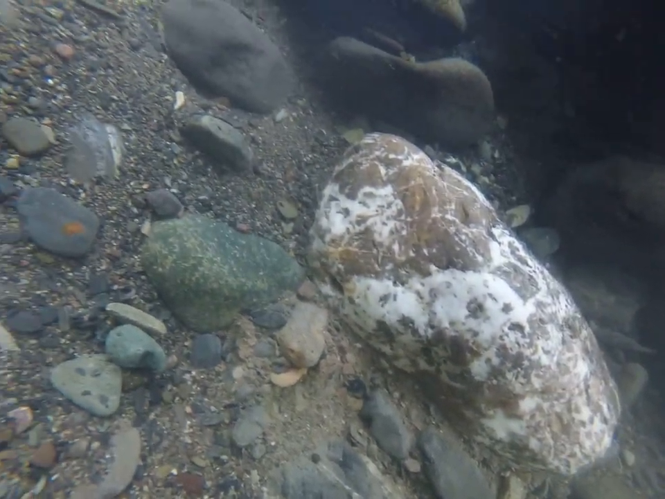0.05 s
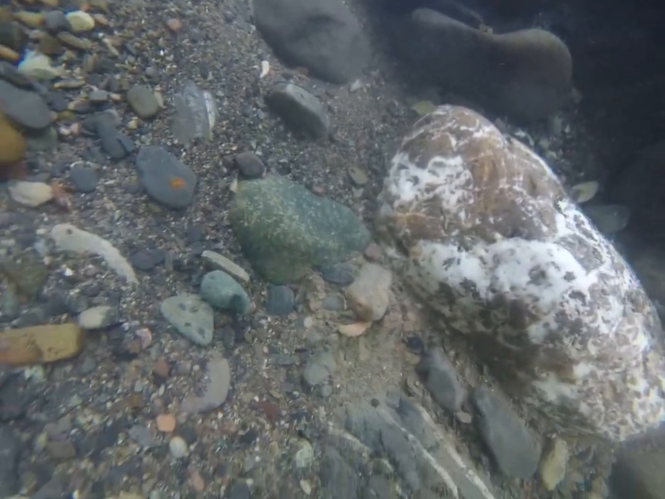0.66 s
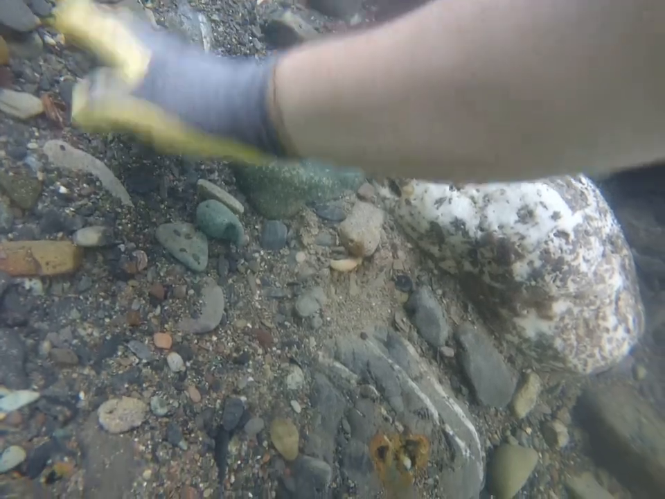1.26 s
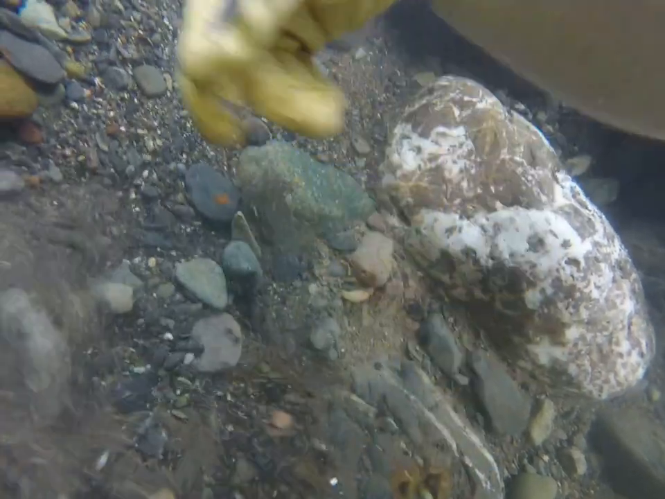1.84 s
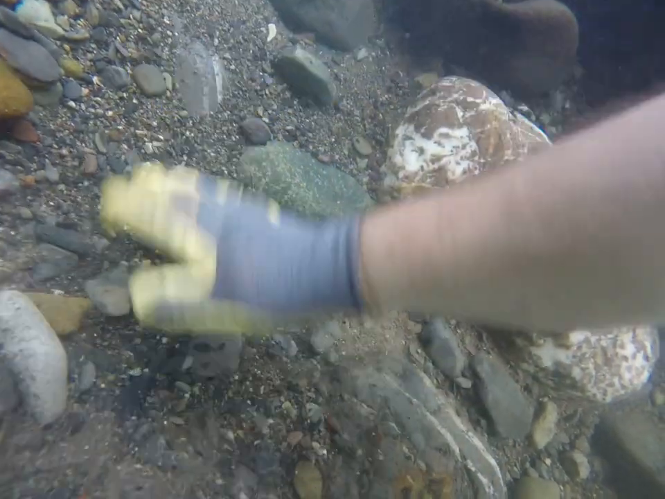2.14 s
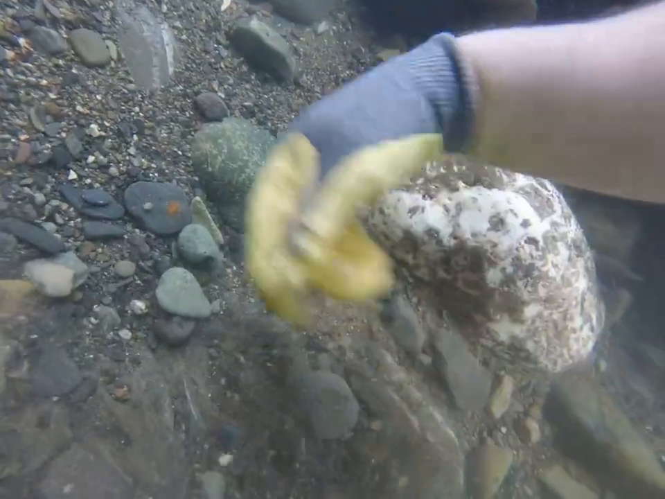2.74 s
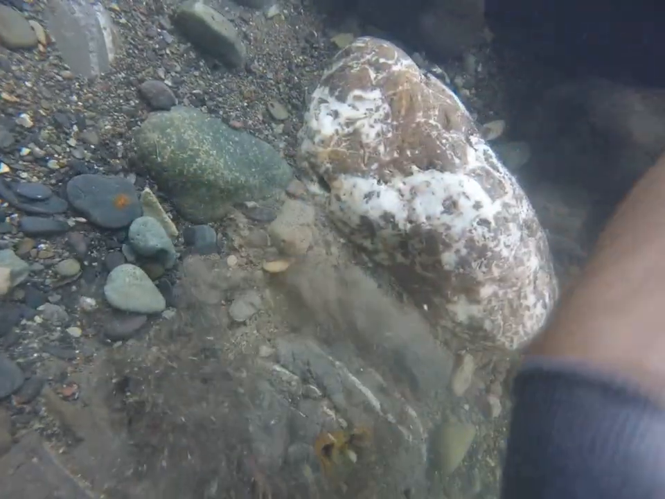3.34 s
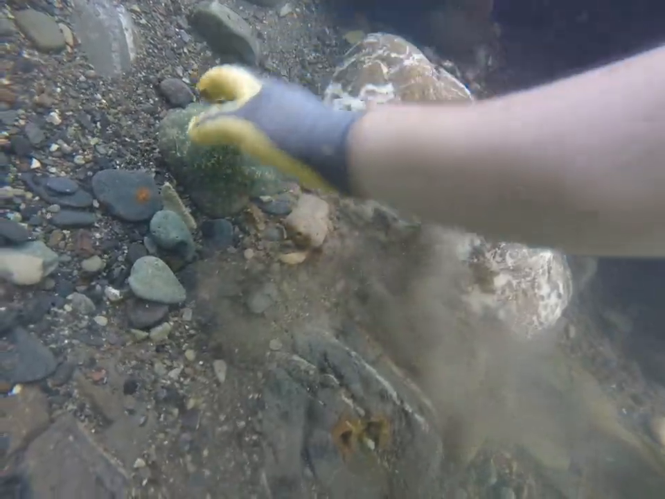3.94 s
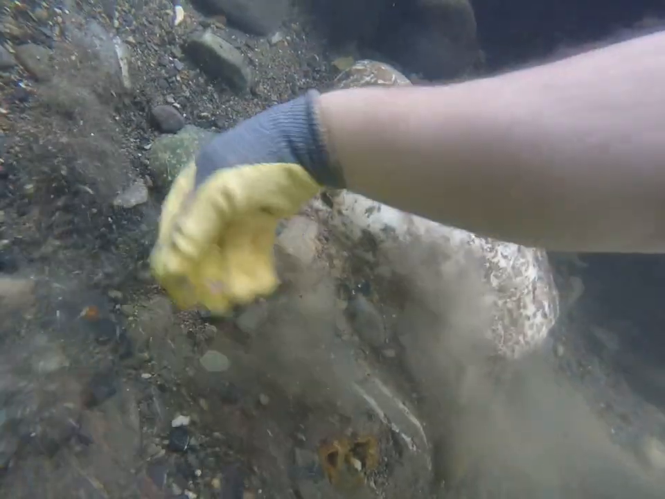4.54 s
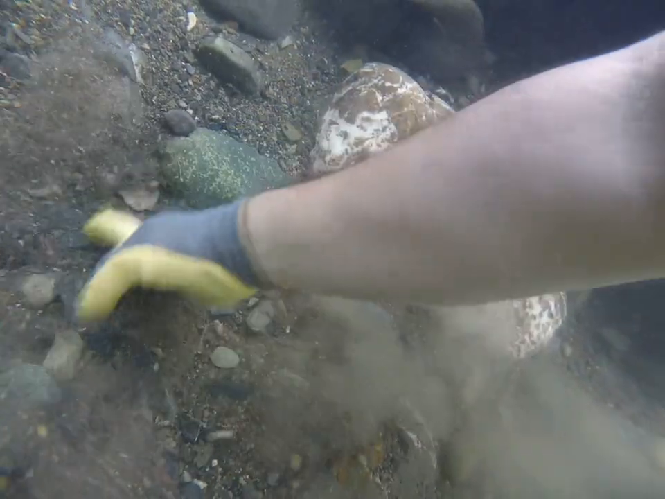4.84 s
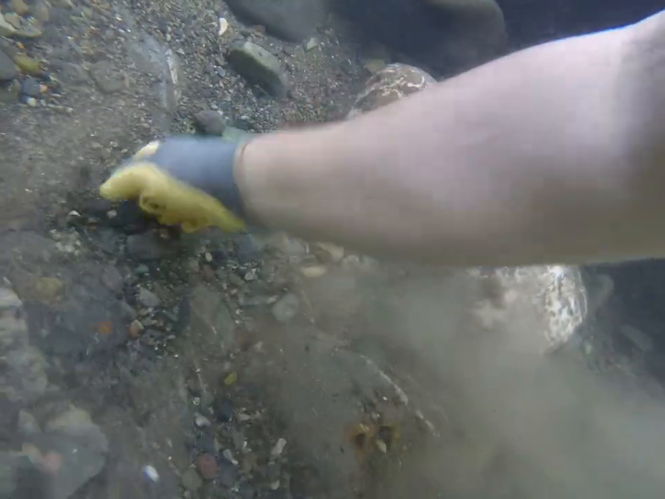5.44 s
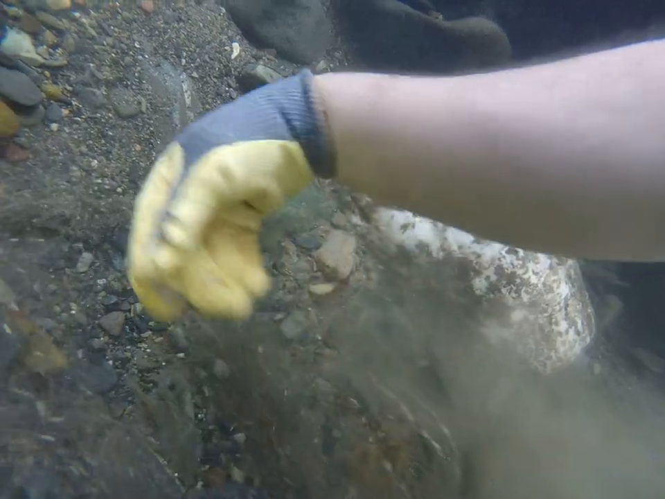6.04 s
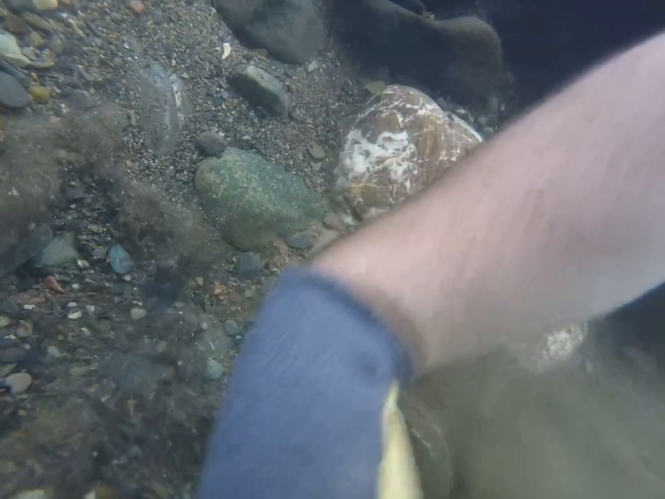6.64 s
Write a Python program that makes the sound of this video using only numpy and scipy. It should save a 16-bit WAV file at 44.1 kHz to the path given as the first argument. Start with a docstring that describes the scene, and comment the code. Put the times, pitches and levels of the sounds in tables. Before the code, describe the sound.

A gloved hand digs through a gravel river bed, heard from a microphone in a waterproof case underwater. A few dull stone knocks and a loud hollow glug come first. Then repeated short strokes scrape grit and sand and make pebbles click, with sharper clusters of clacks in the second half. Water rumbles and gurgles softly throughout, with tiny high bubble pings and a faint hiss.

```python
"""River bed, heard from a waterproof camera case under water: a gloved hand digs through gravel.
Each stroke pushes water ahead of it, scrapes grit and sand and knocks stones together; loose grit
trickles back in between. Water rumbles and glugs, tiny bubbles ping. All of it arrives
through the case, which rings briefly with a hollow note near 610 Hz. A faint hiss lies underneath."""
import sys
import numpy as np
from scipy import signal
from scipy.fft import rfft, irfft
from scipy.io import wavfile

SR = 44100
rng = np.random.default_rng(int(sys.argv[2]) if len(sys.argv) > 2 else 0)


def wrap_up_sound(samples):
    """Save the sound to the file named by the first command line argument, as 16-bit audio."""
    columns = np.atleast_2d(samples).T
    # keep every value between -1 and 1, then stretch to whole-number steps
    tamed = np.clip(columns, -1, 1)
    steps = np.round(tamed * 32767).astype(np.int16)
    wavfile.write(sys.argv[1], SR, steps)


N = 295029

# case modes, wall (thud), stiffer (clack), highest (crack): (frequency [Hz], gain [dB], t60 [s])
THUD_MODES = [(450, -29.5, 0.018), (611.3, -0.5, 0.034), (960, -19, 0.037)]
CLACK_MODES = [(1190, -9.5, 0.005), (1697, -19.5, 0.015), (1812, -18, 0.025), (2363, -9.5, 0.016),
               (2620, -9.5, 0.0097), (2888, -7.5, 0.0053), (3660, -8, 0.007), (4080, -17.5, 0.017)]
CRACK_MODES = [(4540, -3, 0.0033), (5720, 4, 0.0041), (6280, -1.5, 0.0054), (7590, 6, 0.0037),
               (8200, 2.5, 0.0047), (9320, 2, 0.0024), (11100, 11, 0.0016), (13000, 17, 0.00045)]
# bands where the walls cancel: (centre [Hz], width [Hz])
CASE_NOTCHES = [(1130, 165), (1430, 90), (3250, 220), (8550, 450)]
# background water rumble, dipping after the loud knock at 4.3 s: (time [s], level [dB])
RUMBLE = [(0.0, -54), (0.7, -52), (1.15, -61), (1.65, -50), (2.2, -59), (2.9, -53.5), (3.4, -55.5),
          (4.3, -47.5), (4.42, -64), (4.88, -68), (4.96, -53), (6.68, -73)]
# noise spectra of water, hiss and glove: (frequency [Hz], relative density [dB])
SLOSH_SPECTRUM = [(20, 6), (45, -3), (90, -1), (180, -3), (320, -5), (500, -3), (800, -38.5), (1500, -53.5)]
HISS_SPECTRUM = [(100, -26), (900, -7), (2700, -9.5), (5000, -17), (10000, -26.5), (15000, -21.5)]
SCUFF_SPECTRUM = [(60, -25.5), (180, -9.5), (330, -2), (480, -0.5), (620, 11.5), (780, -7), (940, -21.5),
                  (1200, -58.5)]
# hand and heavy stones pushing into the bed: (time [s], peak [dB], pitch [Hz])
THUMPS = [(0.278, -28.5, 165), (0.594, -27, 96), (2.343, -38, 36), (4.965, -36, 89), (5.684, -30.5, 50.3),
          (6.066, -17, 193), (6.46, -27.5, 85)]
# larger stones colliding: (time [s], thud drive [dB], clack drive [dB], crack drive [dB])
STONE_KNOCKS = [(0.2795, -14, -33, -35), (0.3383, -6.5, -8.5, -28), (0.3495, -10.5, -18, -41),
                (0.374, -19, -29.5, -57), (0.4538, -7, -21.5, -53), (0.468, -35, -27, -35.5),
                (0.4762, -26, -14, -28), (0.4922, -16.5, -28, -50), (0.5167, -19, -30.5, -41),
                (0.585, -26, -24.5, -46), (0.6233, -36, -25.5, -45), (0.6655, -29, -38, -47),
                (1.8372, -26.5, -33, -21.5), (1.6092, -24, -23.5, -23.5), (1.8669, -35, -42, -20.5),
                (2.0098, -37, -33.5, -52), (2.161, -51, -33, -38), (2.3167, -26.5, -21, -23.5),
                (2.448, -28, -27, -27), (2.488, -30, -20.5, -32), (2.5145, -14.5, -27.5, -31),
                (2.6565, -10, -27.5, -64), (2.733, -22, -24.5, -34), (2.809, -22, -25, -25.5),
                (2.8526, -36, -25.5, -27), (2.924, -34.5, -29, -29), (3.0511, -34, -27.5, -41),
                (3.2622, -44, -30, -16), (3.281, -30, -19, -17.5), (3.575, -24.5, -24.5, -40),
                (3.7066, -15, -6.5, -16.5), (3.8015, -31, -25, -37), (4.1601, -32, -33, -39),
                (4.2235, -15, -16, -13.5), (4.2672, -7, -2, -17), (4.2995, -9, -1, -14.5),
                (4.3208, -31, -13, -13), (4.3363, -2, 1.5, -29.5), (4.3538, -12, -8.5, -22),
                (4.46, -25.5, -27.5, -32), (4.5193, -20.5, -18, -36.5), (4.6124, -26.5, -25.5, -40),
                (4.682, -14, -8, -25.5), (5.2971, -24.5, -23.5, -22.5), (5.325, -24, -23, -22),
                (5.3822, -24, -12, -15.5), (5.5101, -27.5, -23, -23.5), (5.615, -34, -22.5, -31),
                (5.7109, -12, -8, -16), (5.7234, -21, -22, -14), (5.7484, -6, -6, -11),
                (5.7702, -26, -10.5, -8), (5.7984, -40, -12.5, -8.5), (5.8069, -13, -5.5, -18),
                (5.8478, -10.5, -8.5, -22), (5.9401, -25, -23.5, -35), (6.0652, -6, -4.5, -21),
                (6.1715, -12.5, -15, -16.5), (6.1869, -9.5, -6.5, -22), (6.1967, -12, -13, -12.5),
                (6.2368, -9, -6.5, -17.5), (6.5665, -7.5, -4, -7.5), (6.5715, -22, -8.5, -6.5),
                (6.5951, -31, -5, -16), (6.609, -9, -6.5, -11.5)]
# hand strokes: (start [s], hold [s], gravel [dB], pushed water [dB])
STROKES = [(0.341, 0.011, -54.5, -41), (0.463, 0.014, -61, -39.5), (1.606, 0.03, -50.5, -61),
           (1.79, 0.16, -51, -49.5), (2.329, 0.19, -45.5, -46), (2.505, 0.2, -55.5, -46),
           (2.75, 0.026, -49, -43.5), (3.23, 0.035, -40.5, -38), (4.222, 0.086, -40.5, -36.5),
           (5.002, 0.041, -52, -41.5), (5.302, 0.13, -49.5, -44), (5.54, 0.07, -47, -41),
           (5.71, 0.097, -34, -35.5), (6.201, 0.046, -44, -40), (6.481, 0.098, -35.5, -31.5)]
# loose grains trickling back: (time [s], grit [dB], sand [dB])
TRICKLE = [(1.385, -87, -90), (1.405, -66, -61), (1.7, -57.5, -52.5), (2.25, -60, -62.5),
           (2.8, -47.5, -52.5), (3.15, -61, -67), (3.35, -53.5, -53), (3.8, -58.5, -61.5),
           (4.15, -68.5, -70), (4.45, -78.5, -71.5), (4.91, -73.5, -71), (4.95, -53, -54), (5.9, -50, -55),
           (6.1, -47.5, -56), (6.68, -52.5, -51.5)]
# tiny bubbles: (time [s], level [dB], pitch [Hz])
BUBBLES = [(0.38, -43, 11440), (1.595, -31, 9380), (2.334, -34, 7350), (2.658, -20.5, 7600),
           (3.706, -13.5, 7400), (4.95, -22.5, 9820), (5.325, -23, 9870), (5.381, -23, 9600),
           (5.725, -16, 9700), (5.879, -24, 9750), (6.1, -27.5, 9870)]
# water glugs on the case: (time [s], peak [dB], pitch [Hz], swell [s])
GLUGS = [(0.588, 0, 645, 0.0032), (0.602, -16.5, 683, 0.005), (0.64, -21, 635, 0.0049),
         (0.667, -13.5, 625, 0.0029), (0.679, -12, 615, 0.006), (0.73, -16.5, 605, 0.0035),
         (0.754, -25, 597, 0.00494), (0.803, -20, 618, 0.0043), (0.851, -36, 590, 0.0044),
         (0.918, -30.5, 646, 0.006), (0.972, -26.5, 613, 0.0031), (1.228, -33, 600, 0.0032),
         (1.293, -37, 619, 0.0039), (2.417, -22, 607, 0.005), (2.783, -17.5, 606, 0.0039),
         (3.689, -23.5, 642, 0.0044), (3.988, -18, 648, 0.00333), (4.015, -16.5, 610, 0.0046),
         (4.027, -12.5, 609, 0.0064), (4.078, -21, 620, 0.0044), (4.256, -16, 660, 0.0035),
         (5.023, -24.5, 623, 0.005), (5.841, -18.5, 548, 0.0042), (6.532, -12.5, 575, 0.0055)]


def from_db(db):
    return 10 ** (np.asarray(db) / 20)


def unit_rms(x):
    return x / np.sqrt(np.mean(x ** 2) + 1e-20)


def clicks(times_s, heights):
    """Single-sample impulses."""
    out = np.zeros(N)
    np.add.at(out, np.clip(np.round(times_s * SR).astype(int), 0, N - 1), heights)
    return out


def add(out, time_s, sound):
    start = int(time_s * SR)
    out[start:start + len(sound)] += sound[:N - start]


def butter(x, hz, kind, order=2):
    return signal.sosfilt(signal.butter(order, hz, kind, fs=SR, output="sos"), x)


def noise(spectrum):
    """Coloured noise, rms 1."""
    hz, db = np.transpose(spectrum)
    bins_hz = np.maximum(np.fft.rfftfreq(N, 1 / SR), 1)
    gain = from_db(np.interp(np.log(bins_hz), np.log(hz), db))
    return unit_rms(irfft(rfft(rng.standard_normal(N)) * gain, N))


def gain_curve(rows, column=1):
    """A dB column as gain per sample."""
    columns = np.transpose(rows)
    return from_db(np.interp(np.arange(N) / SR, columns[0], columns[column]))


def swell(start_s, hold_s, rise_db_per_s, fall_db_per_s):
    """Attack, hold, release as gain per sample."""
    t = np.arange(N) / SR
    db = np.minimum((t - start_s) * rise_db_per_s, (start_s + hold_s - t) * fall_db_per_s)
    return from_db(np.clip(db, -120, 0))


def grains(per_s, spread_db):
    """Random tiny impulses: many weak, few strong."""
    sizes = from_db(spread_db * np.minimum(rng.exponential(1, N), 4))
    return sizes * rng.choice([-1, 1], N) * (rng.random(N) < per_s / SR)


def ring(drive, hz, t60_s):
    """One mode: a unit impulse starts a decaying unit sine."""
    r, w = from_db(-60 / (t60_s * SR)), 2 * np.pi * hz / SR
    return signal.lfilter([0, np.sin(w)], [1, -2 * r * np.cos(w), r * r], drive + 1e-18)


def case_ring(drive, modes):
    """One force rings all modes; neighbours swing in opposite senses."""
    return sum(from_db(db) * (-1) ** k * ring(drive, hz, t60_s)
               for k, (hz, db, t60_s) in enumerate(modes))


def case_patter(drive, modes, scatter):
    """Each grain rings each mode with its own strength; rms 1."""
    out = np.zeros(N)
    for k, (hz, db, t60_s) in enumerate(modes):
        uneven = drive * (1 + scatter * rng.standard_normal(N))
        out += from_db(db) * (-1) ** k * ring(uneven, hz, t60_s)
    return unit_rms(out)


def water(push, bow_lead_s=0.014, gurgle_db=6, wake_db=-23):
    """Eddies rumble, the bow wave leads the gravel; eddies, strokes and wakes make the walls gurgle."""
    rumble = gain_curve(RUMBLE)
    bow_wave = np.interp(np.arange(N) + bow_lead_s * SR, np.arange(N), push)
    wakes = [from_db(db + wake_db) * swell(time_s, 0, rise_db_per_s=900, fall_db_per_s=121)
             for time_s, db, _, _ in GLUGS]
    gurgle = np.hypot(from_db(gurgle_db) * np.hypot(rumble, push), np.max(wakes, axis=0))
    walls = case_patter(grains(per_s=260, spread_db=4.5), THUD_MODES, scatter=0.41)
    return np.hypot(rumble, bow_wave) * noise(SLOSH_SPECTRUM) + gurgle * walls


def hiss(median_db=-61.5, db_per_rumble_db=0.43):
    """Faint hiss that dips with the background rumble."""
    rumble = gain_curve(RUMBLE)
    return from_db(median_db) * (rumble / np.median(rumble)) ** db_per_rumble_db * noise(HISS_SPECTRUM)


def thumps():
    """A heavy push shoves the water once out, once back."""
    out, t = np.zeros(N), np.arange(-SR // 25, SR // 25) / SR
    for time_s, db, hz in THUMPS:
        phase = 2 * np.pi * hz * t
        add(out, time_s + t[0], from_db(db) * phase * np.exp((1 - phase ** 2) / 2))
    return out


def strike(times_s, level_db, modes, scatter_db=2.5, tilt_db_per_oct=0):
    """Blows start all modes at once, in a slightly different mix each time."""
    jitter_db = scatter_db * rng.standard_normal((len(times_s), len(modes)))
    octaves = np.log2([hz for hz, _, _ in modes])
    drive_db = np.c_[level_db] + np.outer(tilt_db_per_oct, octaves - octaves.mean()) + jitter_db
    return sum(ring(clicks(times_s, from_db(db + drive_db[:, k])), hz, t60_s)
               for k, (hz, db, t60_s) in enumerate(modes))


def crush(times_s, energy_db, decay_s):
    """Rough faces crush grains: one short noise burst per contact."""
    r = np.exp(-1 / (decay_s * SR))
    fade = signal.lfilter([np.sqrt(1 - r * r)], [1, -r], clicks(times_s, from_db(energy_db)) + 1e-18)
    return fade * rng.standard_normal(N)


def stones(knocks):
    """Each knock sends a pressure spike into the case, roughened by crushed grains."""
    times_s, thud_db, clack_db, crack_db = np.transpose(knocks)
    tilt = 0.66 * np.clip(crack_db - clack_db + 15.5, -20, 10)   # hard contact favours high modes
    thud = strike(times_s, thud_db + 1, THUD_MODES)
    clack = strike(times_s, clack_db + 3, CLACK_MODES, tilt_db_per_oct=tilt)
    crunch = case_ring(crush(times_s, clack_db - 14, decay_s=0.0014), CLACK_MODES)
    crack = case_ring(crush(times_s, crack_db - 7, decay_s=0.0013), CRACK_MODES)
    body = butter(clack + crunch, 2900, "low")   # stones touch longer than grit
    # too little water moves to carry bass
    return butter(thud, 370, "high") + butter(body, 1000, "high") + butter(crack, 3100, "high")


def digging(stroke_sand_db=-3):
    """The glove bites fast and eases off: envelopes of gravel, sand and pushed water."""
    drag, push = 0, 0
    for start_s, hold_s, gravel_db, water_db in STROKES:
        stroke = swell(start_s, hold_s, rise_db_per_s=463, fall_db_per_s=304)
        drag = np.maximum(drag, from_db(gravel_db) * stroke)
        push = np.maximum(push, from_db(water_db) * stroke)
    gravel = np.hypot(gain_curve(TRICKLE), drag)
    sand = np.hypot(gain_curve(TRICKLE, column=2), from_db(stroke_sand_db) * drag)
    return gravel, sand, push


def pebble_knocks(gravel, per_s=20, above_gravel_db=19, spread_db=1.5, ceiling_db=-19.5):
    """Pebbles click unevenly, as hard as the gravel moves; rows as in STONE_KNOCKS."""
    time_jitter, clack_jitter, thud_jitter, crack_jitter = rng.standard_normal((400, 4)).T
    times_s = (np.arange(len(time_jitter)) + 0.5 * time_jitter) / per_s
    gravel_db = 20 * np.log10(np.interp(times_s * SR, np.arange(N), gravel))
    clack_db = np.minimum(gravel_db + above_gravel_db + spread_db * clack_jitter, ceiling_db)
    thud_db = clack_db - 6 + spread_db * thud_jitter
    crack_db = clack_db + 1 + spread_db * crack_jitter
    rows = np.c_[times_s, thud_db, clack_db, crack_db]
    return rows[(times_s > 0) & (times_s < N / SR)]


def scraping(gravel, sand, grit_db=-1, scuff_db=1):
    """Grit ticks, sand fizzes, the glove scuffs dully through the bed."""
    coarse = unit_rms(grains(per_s=600, spread_db=5))
    fine = unit_rms(grains(per_s=9000, spread_db=3.5))
    grit = butter(coarse + 0.41 * fine, 1900, "high", order=1)
    ticks = case_patter(grit, CLACK_MODES, scatter=0.74)
    fizz = butter(case_patter(0.5 * coarse + fine, CRACK_MODES, scatter=0.98), 4700, "high")
    scuff = from_db(scuff_db) * noise(SCUFF_SPECTRUM)
    return from_db(grit_db) * gravel * ticks + sand * (fizz + scuff)


def bubbles(attack_s=0.001, t60_s=0.023, rise_per_t60=0.014):
    """Bubbles freed from the gravel ring, rising slightly in pitch."""
    out, t = np.zeros(N), np.arange(SR // 10) / SR
    envelope = from_db(-60 * t / t60_s) * (1 - np.exp(-t / attack_s))
    for time_s, db, hz in BUBBLES:
        phase = 2 * np.pi * hz * t * (1 + rise_per_t60 * t / t60_s / 2)
        add(out, time_s, from_db(db) * envelope * np.sin(phase))
    return out


def glugs(rasp_db=-39):
    """Soft pushes of water swell for a few cycles near the case's hollow note, with a faint rasp."""
    out, t = np.zeros(N), np.arange(SR // 20) / SR
    for time_s, db, hz, swell_s in GLUGS:
        envelope = (t / swell_s * np.exp(1 - t / swell_s)) ** 2
        add(out, time_s - swell_s, from_db(db) * envelope * np.sin(2 * np.pi * hz * t))
    rasp = butter(case_ring(out * rng.standard_normal(N), CLACK_MODES), 2300, "low")
    return out + from_db(rasp_db) * rasp


def case_notches(x):
    """The case swallows narrow bands between its modes."""
    for hz, width_hz in CASE_NOTCHES:
        x = signal.lfilter(*signal.iirnotch(hz, hz / width_hz, fs=SR), x)
    return x


def scene():
    """Stones, grit and water through the case, over hiss; mono."""
    gravel, sand, push = digging()
    knocks = np.vstack([STONE_KNOCKS, pebble_knocks(gravel)])
    river = scraping(gravel, sand) + water(push) + glugs() + bubbles() + thumps() + stones(knocks)
    return (case_notches(river) + hiss())[None]


def record(dry):
    """Treble roll-off, clipping at full scale, steep band edge."""
    rolloff_hz, edge_hz = 12000, 16200
    clipped = np.clip(butter(dry, rolloff_hz, "low", order=5), -1, 1)
    return signal.sosfilt(signal.ellip(10, 0.1, 80, edge_hz, fs=SR, output="sos"), clipped)


dry = scene()
out = record(dry)
wrap_up_sound(out)
```